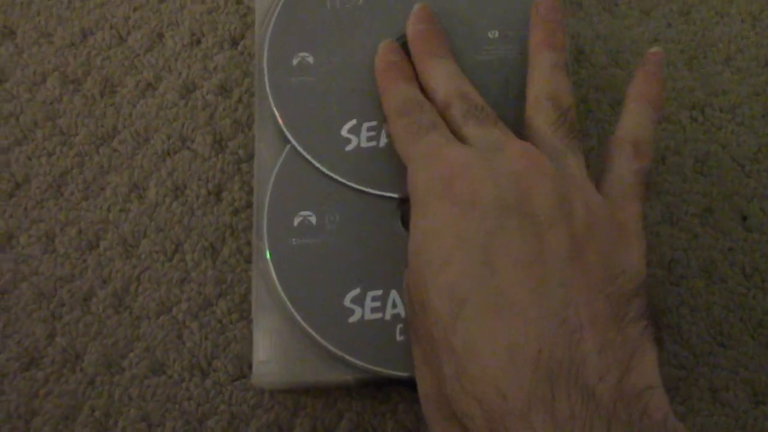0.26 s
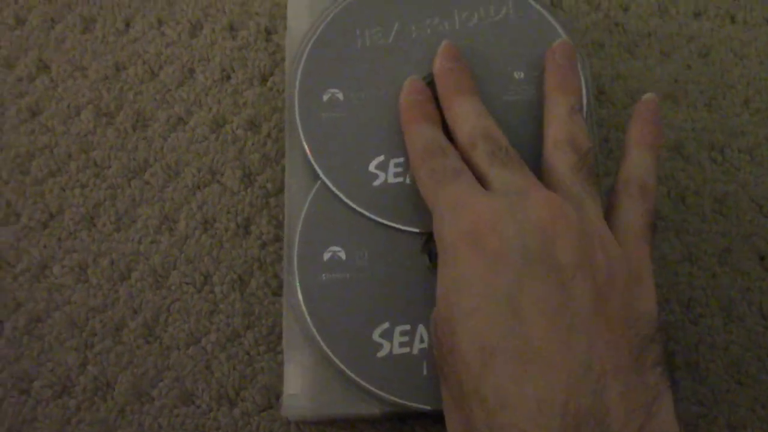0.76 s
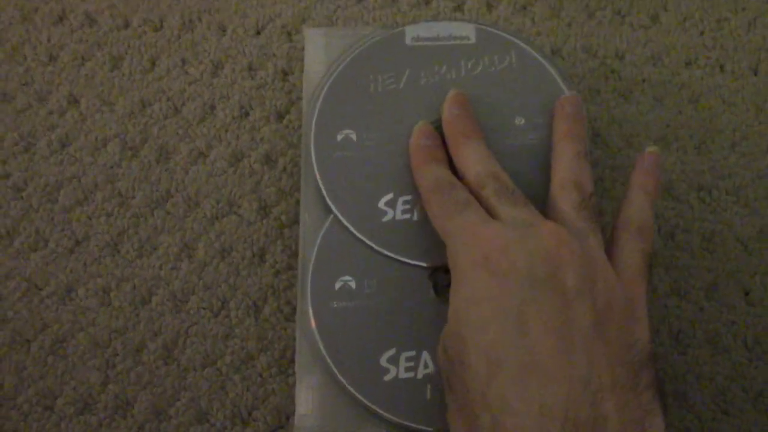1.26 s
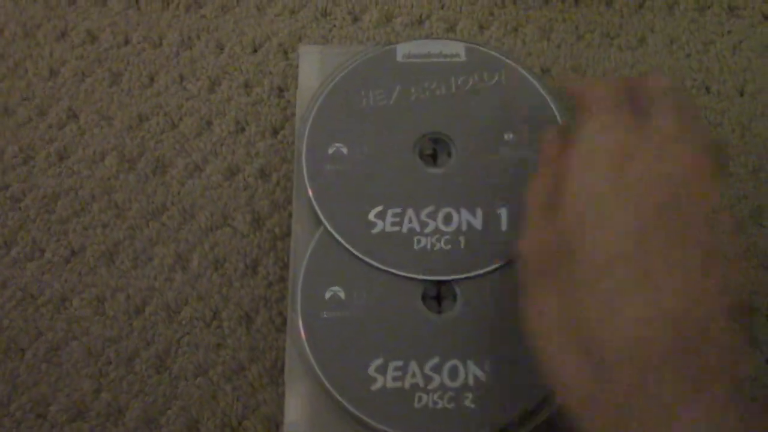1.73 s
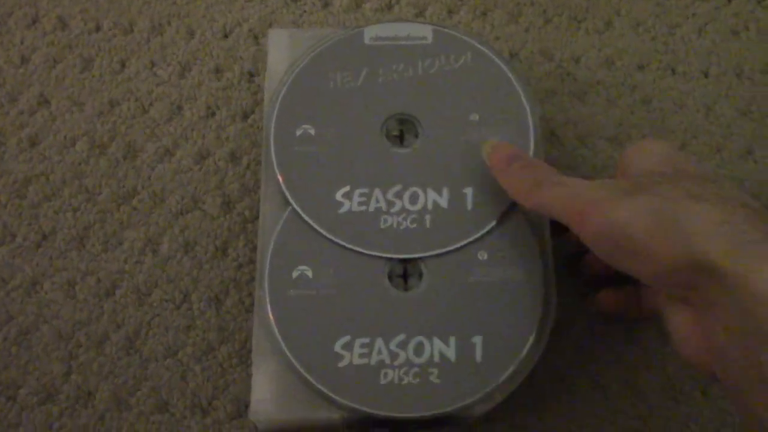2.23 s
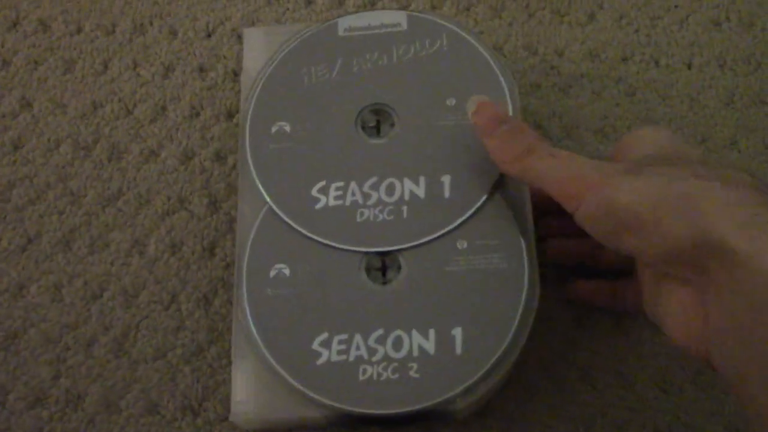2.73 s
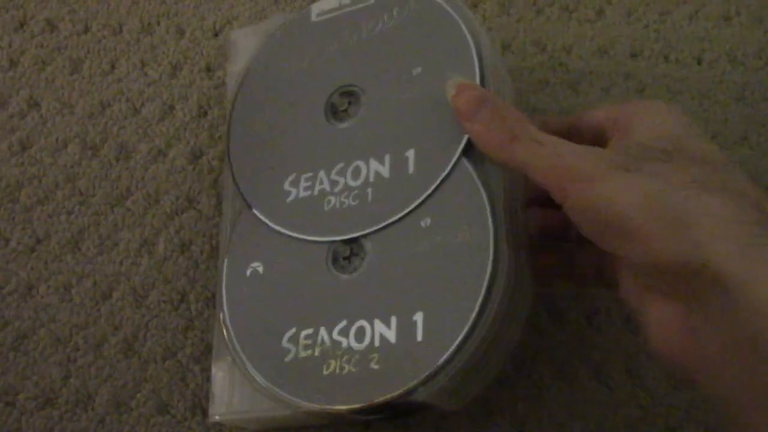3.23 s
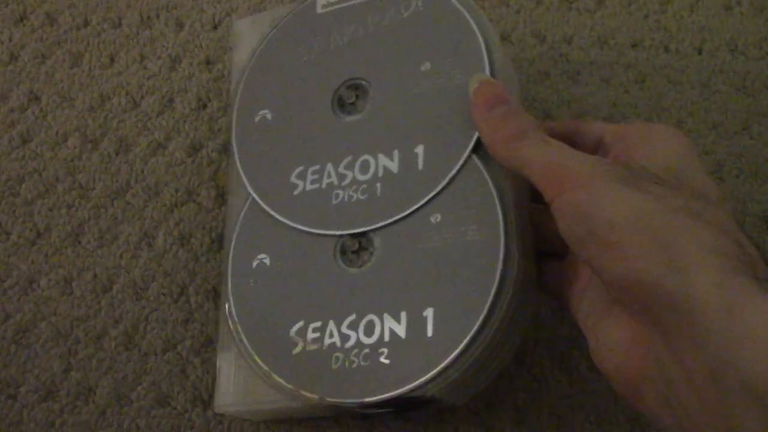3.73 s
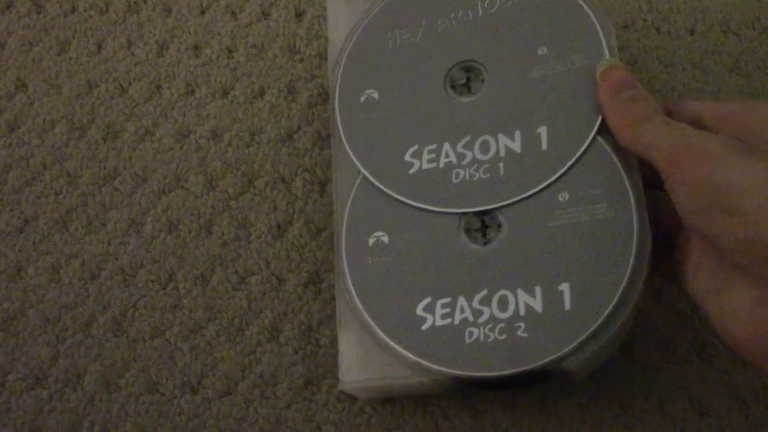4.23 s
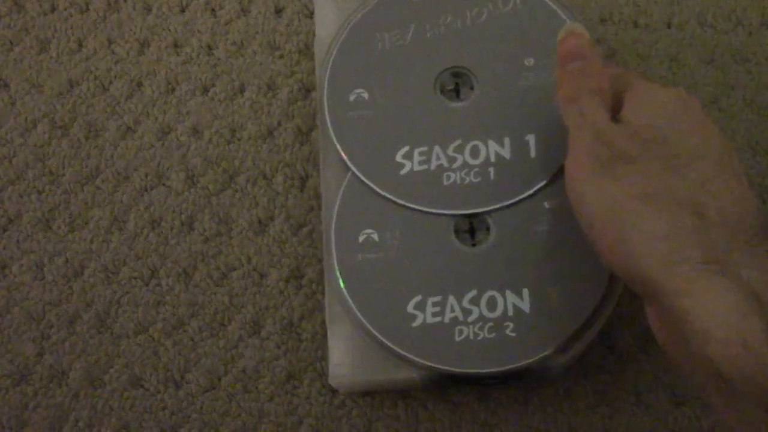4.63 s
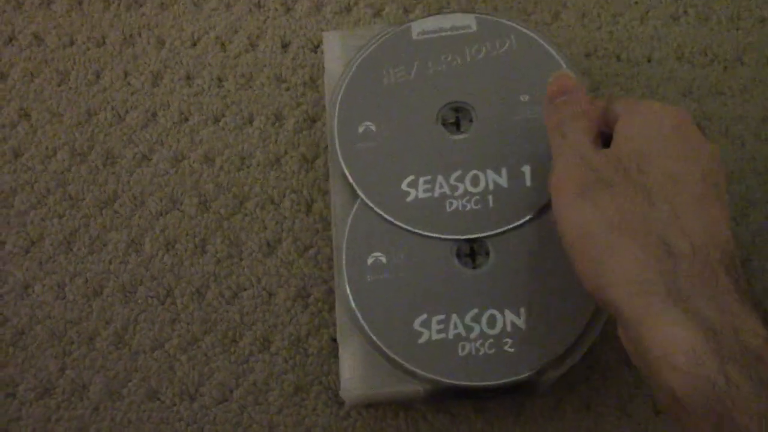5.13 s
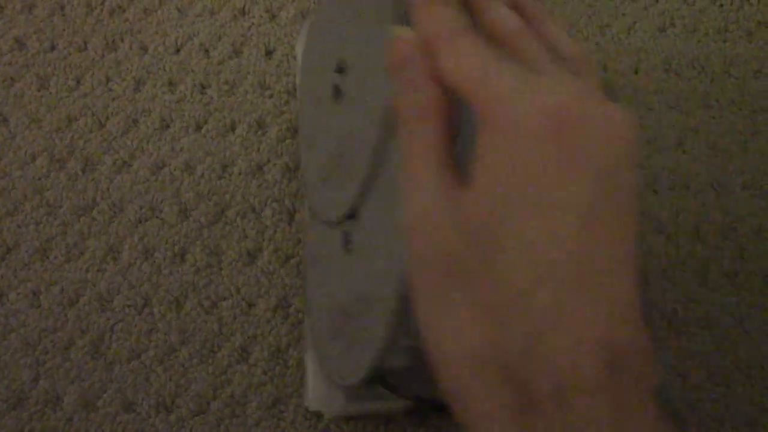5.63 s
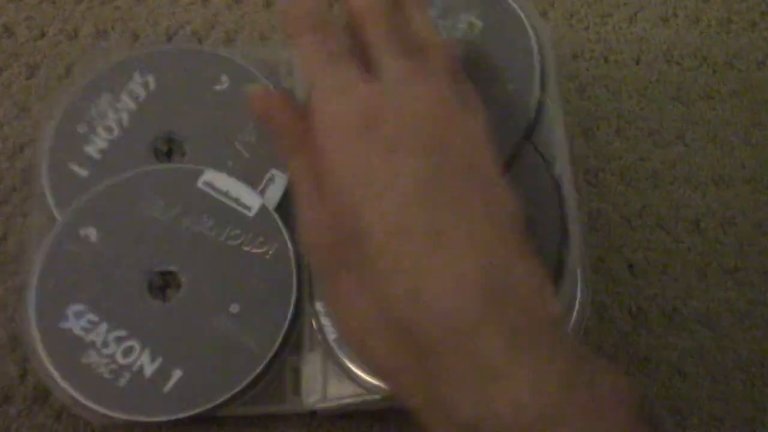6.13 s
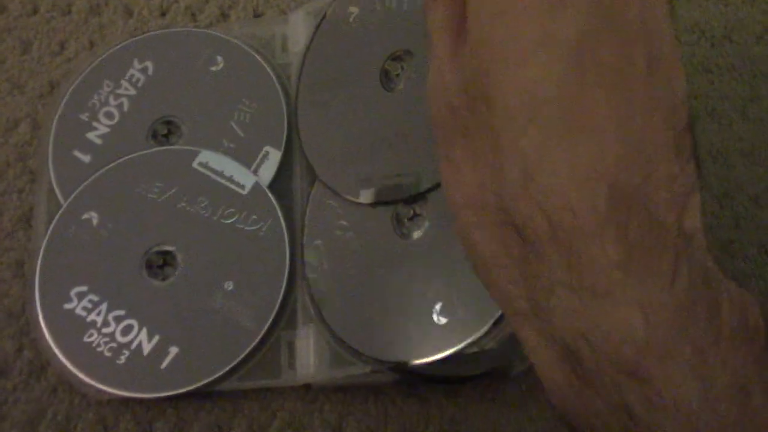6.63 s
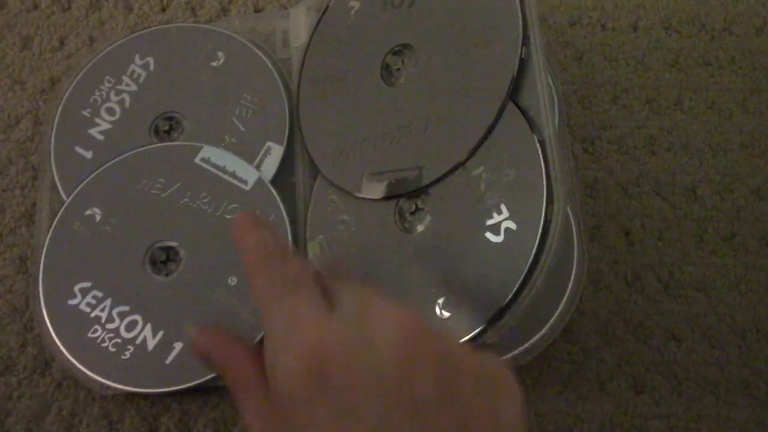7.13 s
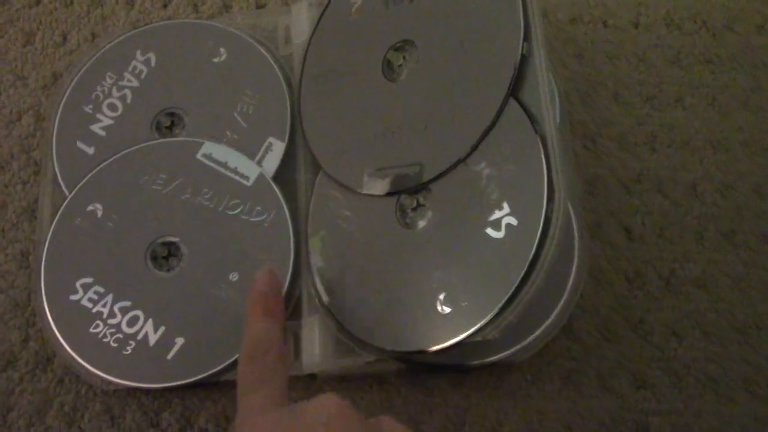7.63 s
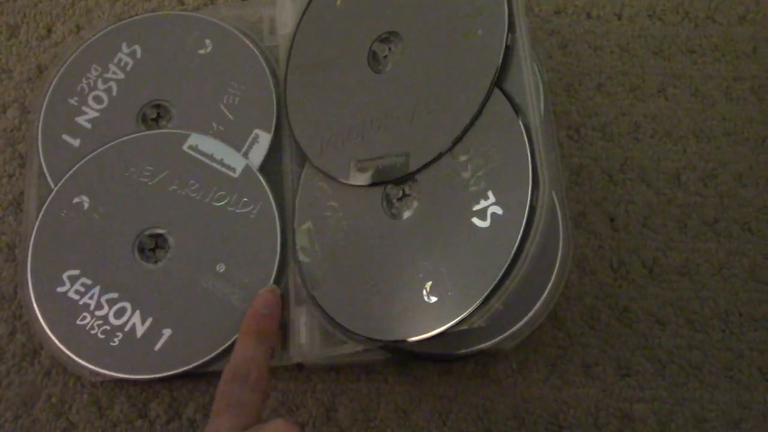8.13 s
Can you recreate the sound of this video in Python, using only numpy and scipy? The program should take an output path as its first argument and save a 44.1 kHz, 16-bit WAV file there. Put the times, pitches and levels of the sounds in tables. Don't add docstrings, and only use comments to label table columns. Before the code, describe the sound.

After a near-silent second, a sharp plastic crack rings the case briefly. Small nail taps, squeaky rubs and dry creaks follow, then a crackling release of clustered clicks. Soft handling leads to a hollow tray landing and rattling loose discs, quickly settling. Only airy fingertip rubbing remains. Close stereo microphone, small soft room, low rumble, hiss and a faint mechanical whirr.

```python
import sys
import numpy as np
from scipy import signal
from scipy.fft import rfft, irfft
from scipy.io import wavfile
from scipy.ndimage import uniform_filter1d

SR = 44100
rng = np.random.default_rng(int(sys.argv[2]) if len(sys.argv) > 2 else 0)


def volts_from_db(level):
    exponent = np.asarray(level, float) / 20
    return 10 ** exponent


def generate_wav(signal):
    frames = np.transpose(np.atleast_2d(signal))
    scaled = np.clip(frames, -1, 1) * 32767
    pcm = np.round(scaled).astype(np.int16)
    wavfile.write(sys.argv[1], SR, pcm)


N = 369116

# [f/Hz, level/dB, t60/s]
TRAY = [(396.3, -8, 0.018), (546, -3, 0.022), (670, -2, 0.014), (807, -2.5, 0.028), (1077, -0.5, 0.0091)]
# [f/Hz, level/dB, t60/s]
DISC = [(1350, -8.5, 0.0066), (1630, -3.5, 0.018), (1767, 0, 0.0069), (2028, 2.5, 0.011)]
# [f/Hz, level/dB, t60/s]
HUB = [(2434, -1, .008), (2820, -4, 0.018), (3262, -1.5, 0.0077), (3980, 3, .005), (5070, -3, 0.006)]
# [f/Hz, level/dB, t60/s]
RIM = [(1737, 6, 0.013), (1490, 2.5, 0.0092), (1200, 4.5, 0.0054)]


def contacts():
    # [t/s, strength/dB, tray share/dB, brightness/dB]
    hand_snaps = [(0.276, -37.5, -22, -4), (1.074, -21.5, -7.5, -7), (1.193, -36, 4, -17),
                  (1.202, -3.5, -1.5, 5), (1.205, -8, -7.5, 0), (1.209, -18.5, -18, -6),
                  (1.214, -31, 11, 3), (1.869, -37, -6, -2.5), (1.912, -37, -5.5, -6.5),
                  (1.942, -46.5, -12, -2), (2.043, -26.5, -4, 1), (2.054, -42, 10, -14),
                  (2.482, -42, -6, -9), (2.501, -36.5, -8.5, -2), (2.621, -26, 2.5, -8),
                  (2.646, -37, -1.5, 1), (2.748, -46, 0.5, -12), (2.769, -28, -8, -9),
                  (2.951, -46.5, -3.5, 0.5), (3.038, -38.5, 6.5, -7), (3.197, -42, -11, 4),
                  (3.243, -35, -9, -5), (3.248, -39, -3.5, 2), (3.265, -32.5, -9, -1.5),
                  (3.286, -39, -7, -2), (3.763, -36.5, -15, -13), (4.198, -39, -2.5, -8),
                  (5.205, -43.5, -1, 3.5), (5.925, -38.5, 1.5, -8), (5.972, -48, 2.5, -2)]
    # [t/s, strength/dB, tray share/dB, brightness/dB]
    teeth = [
        (4.744, -46.5, -2.5, -13),
        (4.7575, -47, 0.5, -3.5),
        (4.764, -43, 6, -10),
        (4.772, -25, -10, -7),
        (4.777, -17, -15, -7),
        (4.784, -15, -30, -11),
        (4.7889, -13.5, -20, 0),
        (4.792, -20.5, -20, 5),
        (4.803, -36, 4, -2),
        (4.829, -50, 12, 15),
    ]
    # [t/s, strength/dB, brightness/dB]
    clatter = [(6.158, -39, -8), (6.162, -29.5, 3), (6.17, -16, 4), (6.173, -19.5, 4.5), (6.183, -38, -3),
               (6.19, -31, 11), (6.194, -20.5, 3.5), (6.202, -36, -8), (6.208, -30, -13), (6.217, -36, 10),
               (6.227, -30, 0), (6.236, -50, 0), (6.242, -47, -6), (6.262, -45, 5), (6.267, -41, -9),
               (6.29, -43.5, 0.5), (6.331, -43, -3), (6.349, -50, -1.5), (6.381, -48.5, -1),
               (6.407, -39.5, -1), (6.414, -42.5, 2), (6.42, -38, 6.5)]
    # [t/s, strength/dB, brightness/dB]
    ticks = [(1.596, -51, 6), (1.811, -44, -10), (2.304, -47, -3), (2.709, -48.5, 1), (2.777, -45, 8),
             (2.799, -45, -9), (2.815, -51, -16), (3.45, -47.5, -8), (3.481, -48.5, -3), (3.669, -43, -2),
             (3.699, -45, -9), (3.722, -42.5, -16), (4.105, -49.5, -6), (4.189, -49.5, -3.5),
             (4.856, -49, -3), (5.096, -51.5, -3.5), (5.127, -49, -7), (5.407, -48.5, -5),
             (5.79, -57.5, 5.5), (5.806, -48, -2.5), (5.911, -58, -8), (2.13, -51, -14), (5.981, -43, -5.5),
             (5.999, -54, 3.5), (6.087, -46, -4.5), (6.472, -52, -3), (6.49, -52, -4), (7.015, -55, 1),
             (7.366, -56, 5), (8.061, -53.5, 1.5)]
    clatter_tray_db, tick_tray_db = 0, -5.5
    loose = [(s, db, clatter_tray_db, bright) for s, db, bright in clatter]
    faint = [(s, db, tick_tray_db, bright) for s, db, bright in ticks]
    return np.array(hand_snaps + teeth + loose + faint)


def snaps():
    # [f/Hz, level/dB, t60/s]
    edge_modes = [(5864, -8, 0.011), (6600, -6.5, 0.017), (7485, 2.5, .004), (8410, -1, 0.0065),
                  (9420, -2, 0.007), (11030, -9, 0.0061), (12015, -10, 0.005), (14000, -8.5, .002)]
    rows = contacts()
    strength_db, tray_db, bright_db = rows[:, 1:2], rows[:, 2], rows[:, 3]

    length_ms = np.clip(2.2 + 0.017 * strength_db, .4, 5)
    age_ms = np.arange(1024) * 1000 / SR
    shape = np.exp(-age_ms / length_ms) + 0.3 * np.exp(-age_ms / 4)
    shape = shape * (1 - np.exp(-age_ms / 0.095))
    slips = rng.laplace(size=shape.shape) * shape
    for _ in range(4):
        tones = rfft(slips)
        slips = irfft(tones / uniform_filter1d(np.abs(tones), size=5, axis=1))
        slips *= shape / np.sqrt(uniform_filter1d(slips ** 2, size=41, axis=1) + 1e-12)
    slips *= volts_from_db(strength_db) / np.sqrt(np.sum(slips ** 2, axis=1, keepdims=True))

    hub_lean_db = 0.18 * bright_db
    parts = [(TRAY, tray_db - 9), (DISC, -11 - hub_lean_db), (HUB, -8 + hub_lean_db),
             (edge_modes, bright_db - 7)]
    # shorter rings, 5 dB make-up gain
    blurred = [([(hz, db + 5, 0.48 * t60) for hz, db, t60 in modes], share) for modes, share in parts]
    near = struck(rows, size=2048, slips=slips, parts=parts)
    return near, struck(rows, size=2048, slips=slips, parts=blurred)


def struck(rows, size, slips, parts, bend=.025):
    hz, response = np.fft.rfftfreq(size, 1 / SR), 0
    for modes, share_db in parts:
        luck = rng.standard_normal((len(rows), len(modes), 2))
        for k, (mode_hz, level_db, t60) in enumerate(modes):
            centre = mode_hz * (1 + bend * luck[:, k, :1])
            damping = np.log(1000) / (np.pi * t60)
            gain = volts_from_db(share_db + level_db + 1.5 * luck[:, k, 1])[:, None]
            gain = gain * (-1) ** k
            response = response + gain * 1j * hz / (centre ** 2 - hz ** 2 + 1j * hz * damping)
    tails = irfft(rfft(slips, size) * response * SR / (2 * np.pi), size)
    tails[:, -256:] = 0
    out = np.zeros(N + size)
    for s, tail in zip(rows[:, 0] + .0004, tails):
        start = round(s * SR)
        out[start:start + size] += tail
    return out[:N]


def rings():
    # [t/s, level/dB]
    rim_taps = [
        (2.0439, -26.5),
        (2.483, -47),
        (2.5021, -43),
        (2.6219, -35.5),
        (2.7685, -34.5),
        (3.245, -55),
        (4.2, -52.5),
        (4.785, -35.5),
    ]
    # [t/s, level/dB]
    landings = [
        (5.207, -60),
        (5.91, -61),
        (5.925, -54),
        (5.99, -58),
        (6.17, -26),
        (6.183, -26.5),
        (6.198, -32),
        (6.263, -50),
        (6.42, -51.5),
    ]
    # [f/Hz, level/dB, t60/s]
    open_tray = [(418, -9, 0.14), (808, -6, 0.15), (955, -8, 0.07), (1290, -4, 0.046)]
    tap = np.hanning(9)[None] / 4
    rim, tray = np.array(rim_taps), np.array(landings)
    return (struck(rim, size=4096, slips=tap, parts=[(RIM, rim[:, 1])], bend=0.006)
            + struck(tray, size=8192, slips=tap, parts=[(open_tray, tray[:, 1])], bend=0.011))


def thuds():
    # [t/s, level/dB]
    knocks = [
        (1.075, -51.5),
        (1.207, -35.5),
        (2.048, -41),
        (2.055, -41.5),
        (2.623, -46.5),
        (3.038, -56.5),
        (4.789, -42),
        (6.169, -41),
        (6.414, -62),
    ]
    # [f/Hz, level/dB, t60/s]
    carpet_modes = [(178, -2, 0.0562), (205, 0, 0.11), (295, 2.5, 0.036)]
    rows = np.array(knocks)
    push = np.hanning(100)[None] / 25
    return struck(rows, size=8192, slips=push, parts=[(carpet_modes, rows[:, 1])])


def rubs():
    # [f/Hz, density/dB]
    skin_colour = [(1760, -8), (3000, 9), (3360, 6), (4200, 3), (4900, 2), (9730, -2), (15100, -22.5),
                   (16000, -27)]
    hiss_gain, body_gain = pressure()
    catches = rng.random(N) < 10000 / SR
    grains = catches * rng.laplace(size=N) * volts_from_db(2.6 * drift(60))
    bin_hz = np.fft.rfftfreq(N, 1 / SR) + 1
    hiss = rms_one(irfft(rfft(grains) * volts_from_db(at_hz(skin_colour, bin_hz)), N))
    modes = TRAY[4:] + DISC + HUB[:3]
    body = rms_one(sum(volts_from_db(level_db) * ring(grains, hz, 0.63 * t60) for hz, level_db, t60 in modes))
    rim_hz, _, rim_t60 = RIM[0]
    body = body + volts_from_db(-10) * rms_one(ring(grains, rim_hz, rim_t60))
    body = signal.sosfilt(signal.butter(2, 700, "high", fs=SR, output="sos"), body)
    return volts_from_db(1.64) * hiss_gain * hiss + volts_from_db(-5.5) * body_gain * body


def pressure():
    # [start t/s, length/s, hiss level/dB, body over hiss/dB]
    light_rubs = [
        (1.699, 0.24, -75.5, 4),
        (3.397, 0.13, -75.5, 4.5),
        (3.82, .18, -77.5, 0.5),
        (4.082, 0.19, -76.5, 10.5),
        (4.995, 0.32, -76.5, 7),
        (5.873, 0.12, -77.5, 11),
        (6.03, .12, -82, 12),
        (6.28, .12, -84, 18),
        (6.44, 0.084, -79.5, 15),
    ]
    # [peak t/s, swell/s, ebb/s, hiss level/dB, body over hiss/dB]
    strokes = [(2.766, 0.054, 0.0037, -59, 7.5), (2.774, .005, 0.021, -49, -7), (2.8, .02, 0.33, -68.5, 8),
               (3.246, 0.011, .025, -50.5, 3.5), (3.266, 0.014, .035, -53.5, 2),
               (3.75, .15, 0.13, -73.5, 16), (4.35, 0.055, 0.054, -55.5, 8), (4.44, 0.071, 0.075, -62, 5.5),
               (4.483, .04, 0.078, -58.5, 7), (4.771, 0.056, 0.017, -64, 15), (4.79, .022, 0.018, -26, 3.5),
               (4.81, .01, 0.044, -67, 3), (5.706, 0.13, .1, -73, 10), (5.815, 0.039, 0.058, -71.5, 7.5),
               (5.935, .05, 0.041, -79, 16), (5.992, 0.042, 0.046, -77, 15), (6.175, 0.0028, 0.055, -32, 8),
               (6.227, 0.044, 0.012, -45.5, 0), (6.423, 0.017, 0.026, -50.5, 9),
               (7.068, 0.26, .35, -64.5, -6), (7.32, .12, .1, -71, -3.5), (7.972, 0.21, 0.028, -75, -5.5),
               (8.068, .06, .03, -69, 3.5)]
    fade_s = 0.046
    t, hiss, body = np.arange(N) / SR, np.zeros(N), np.zeros(N)
    for s, length, db, body_db in light_rubs:
        inside = np.minimum(t - s, s + length - t)
        touch = volts_from_db(db) * np.clip(inside / fade_s + .5, 0, 1)
        hiss += touch
        body += touch * volts_from_db(body_db)
    for s, swell, ebb, db, body_db in strokes:
        on, touch = swell_ebb(s, swell, ebb, db)
        hiss[on] += touch
        body[on] += touch * volts_from_db(body_db)
    return hiss, body


def swell_ebb(s, swell, ebb, db):
    on = np.arange(round((s - 2 * swell) * SR), round((s + 2 * ebb) * SR))
    away = np.maximum((s - on / SR) / swell, (on / SR - s) / ebb)
    return on, volts_from_db(db - 25 * away)


def whispers():
    # [peak t/s, swell/s, ebb/s, level/dB]
    glides = [
        (4.255, .04, 0.035, -73),
        (4.345, 0.05, 0.034, -56.5),
        (4.42, 0.043, 0.081, -68.5),
        (5.72, 0.19, .06, -71),
        (5.835, 0.093, 0.037, -65),
        (7.07, .3, 0.29, -70),
    ]
    centre_hz, width_hz = 8960, 2500
    gain, hz = np.zeros(N), np.fft.rfftfreq(N, 1 / SR)
    for glide in glides:
        on, touch = swell_ebb(*glide)
        gain[on] += touch
    band = 1 / (1 + ((hz - centre_hz) / width_hz) ** 4)
    return gain * rms_one(irfft(rfft(rng.standard_normal(N)) * band, N))


def room(x):
    # [f/Hz, t60/s]
    room_decay = [(150, 0.27), (700, 0.16), (4000, 0.15), (12000, 0.085)]
    room_db, side_db = -13, -20
    hop, count = 64, 230
    hz = np.fft.rfftfreq(2 * hop, 1 / SR) + 1
    age = np.arange(count)[:, None] * hop / SR
    phase = np.exp(2j * np.pi * rng.random((2, count, hop + 1)))
    tones = volts_from_db(-60 * age / at_hz(room_decay, hz)) * phase
    bursts = irfft(tones) * np.sin(np.pi * np.arange(2 * hop) / (2 * hop))
    mid, side = (bursts[:, 1:, :hop] + bursts[:, :-1, hop:]).reshape(2, -1)
    tail = mid + volts_from_db(side_db) * side * [[1], [-1]]
    tail = tail * (1 - np.exp(-(np.arange(len(mid)) / SR / 0.0031) ** 2))
    tail = volts_from_db(room_db) * tail / np.sqrt(np.sum(tail ** 2) / 2)
    return signal.fftconvolve(x[None], tail, axes=1)[:, :N]


def ports(x):
    shadow_db, shadow_hz, left_db = -17.5, 3000, .15
    hz = np.fft.rfftfreq(N, 1 / SR) + 1
    bent = rng.standard_normal(160) * np.exp(-np.arange(160) / 25)
    twist = 1j * np.tanh(4 * rfft(bent / np.linalg.norm(bent), N).imag)
    side = volts_from_db(shadow_db) * twist / (1 + (shadow_hz / hz) ** 8)
    return irfft(rfft(x) * np.array([volts_from_db(left_db) + side, volts_from_db(-left_db) - side]), N)


def whirr():
    # [f/Hz, width/Hz, level/dB]
    drive_modes = [(1593, 60, -79), (2186, 68, -79.5)]
    gear_rates = (26.6, 33.5)
    t = np.arange(N) / SR
    throb = sum(np.cos(2 * np.pi * hz * t + .5 * drift(1.5)) for hz in gear_rates)
    out = np.zeros(N)
    for (hz, width_hz, level_db), throb_db in zip(drive_modes, (1.5, 6)):
        t60 = np.log(1000) / (np.pi * width_hz)
        force = rng.standard_normal(N) * volts_from_db(throb_db * throb)
        out += volts_from_db(level_db) * rms_one(ring(force, hz, t60))
    return out


def floor():
    # [f/Hz, level/dB]
    floor_colour = [(15, -59), (25, -34), (146, -2.5), (208, -4), (244, -3), (338, -8.5), (1000, -18),
                    (1550, -21.5), (1920, -24.5), (2200, -18.5), (2660, -26), (4830, -27.5), (13500, -39),
                    (16400, -44)]
    # [f/Hz, side minus mid/dB]
    floor_width = [(60, -9), (130, -16.5), (290, -10.5), (640, -5), (1410, -5), (3100, -8.5), (6820, -34),
                   (15000, -16.5)]
    bands = banded_noise(floor_colour, floor_width, size=N)
    return volts_from_db(-61) * rms_one(sum(band * volts_from_db(0.782 * drift(9.9)) for band in bands))


def banded_noise(spectrum, side_db, size):
    band_edges = 22 * 2 ** (np.arange(30) / 3)
    white = rng.standard_normal((2, 2, size))
    for k, (low, high) in enumerate(zip(band_edges, band_edges[1:])):
        band = signal.butter(2, [low, high], "band", fs=SR, output="sos")
        mid, side = signal.sosfilt(band, white[k % 2])
        hz = np.sqrt(low * high)
        yield volts_from_db(at_hz(spectrum, hz)) * (mid + volts_from_db(at_hz(side_db, hz)) * side * [[1], [-1]])


def ring(force, hz, t60):
    r, w = volts_from_db(-60 / (t60 * SR)), 2 * np.pi * hz / SR
    return signal.lfilter([0, np.sin(w)], [1, -2 * r * np.cos(w), r * r], force + 1e-18)


def drift(rate):
    r = np.exp(-80 * np.pi * rate / SR)
    slow = signal.lfilter([1], [1, -2 * r, r * r], rng.standard_normal(N // 40 + 2002))[2000:]
    return np.interp(np.arange(N) / 40, np.arange(len(slow)), rms_one(slow))


def rms_one(x):
    return x / np.sqrt(np.mean(x ** 2) + 1e-20)


def at_hz(points, hz):
    table_hz, values = np.transpose(points)
    return np.interp(np.log(hz), np.log(table_hz), values)


def scene():
    near, all_round = snaps()
    rest = thuds() + rings() + rubs() + whispers()
    cut = signal.butter(4, 72, "high", fs=SR, output="sos")
    near, all_round = signal.sosfilt(cut, [near + rest, all_round + rest])
    return ports(near + room(all_round)) + whirr() + floor()


def roll_off(x):
    return signal.sosfilt(signal.butter(12, 16530, fs=SR, output="sos"), x)


def record(dry):
    rounded = 1.1 * np.tanh(dry / 1.1)
    top_cut = signal.cheby2(16, 90, 17300, fs=SR, output="sos")
    return roll_off(signal.sosfilt(top_cut, rounded))


dry = scene()
out = record(dry)
generate_wav(out)
```